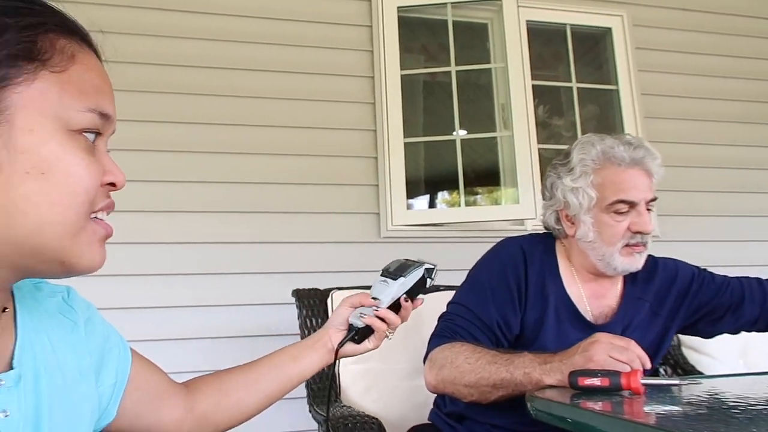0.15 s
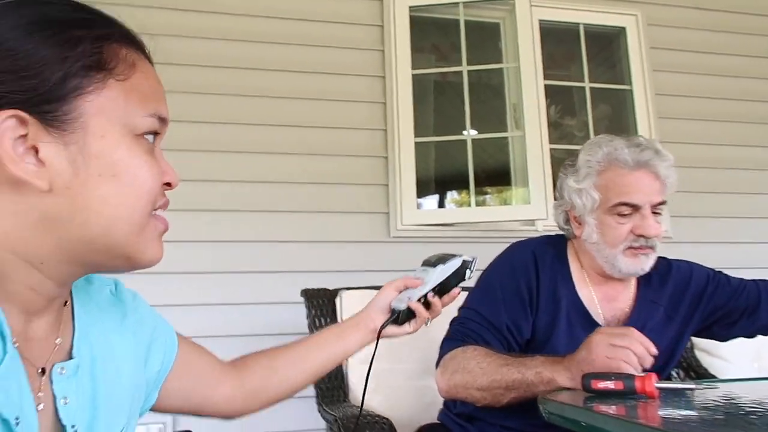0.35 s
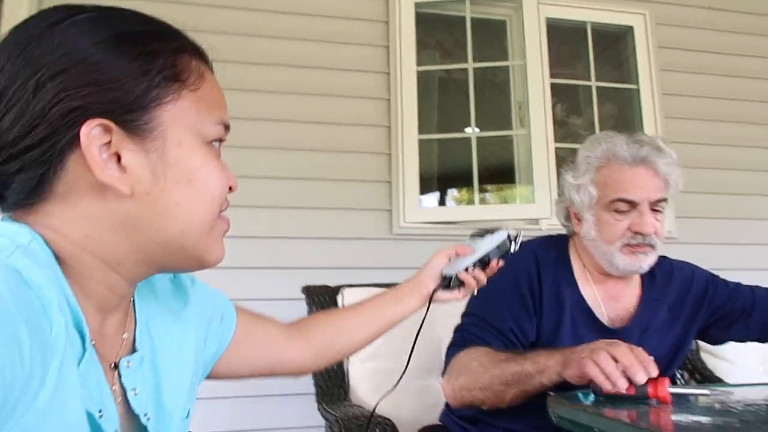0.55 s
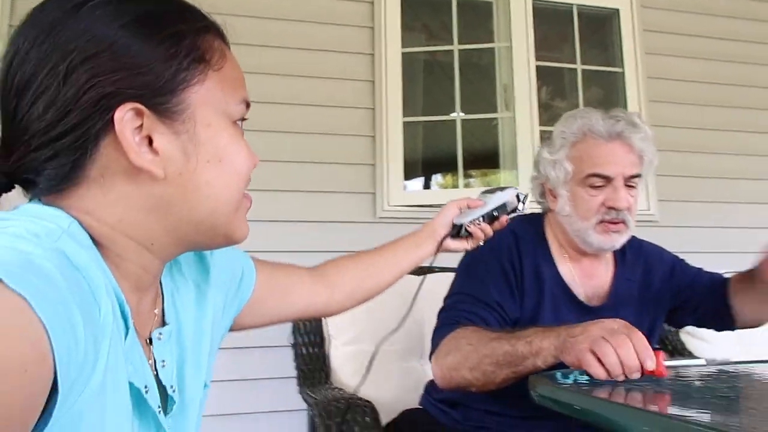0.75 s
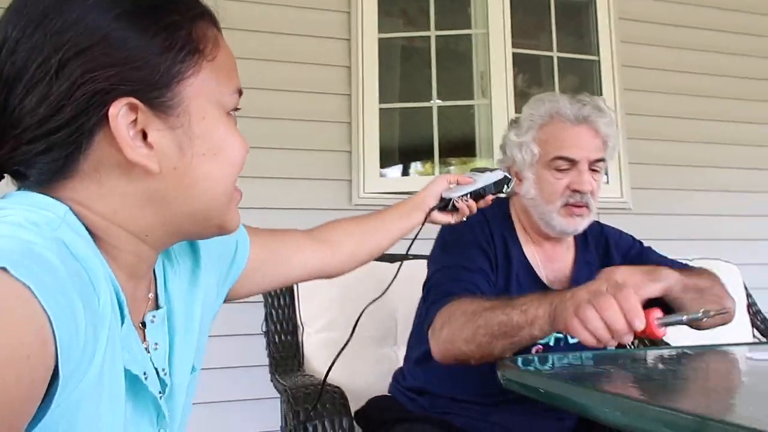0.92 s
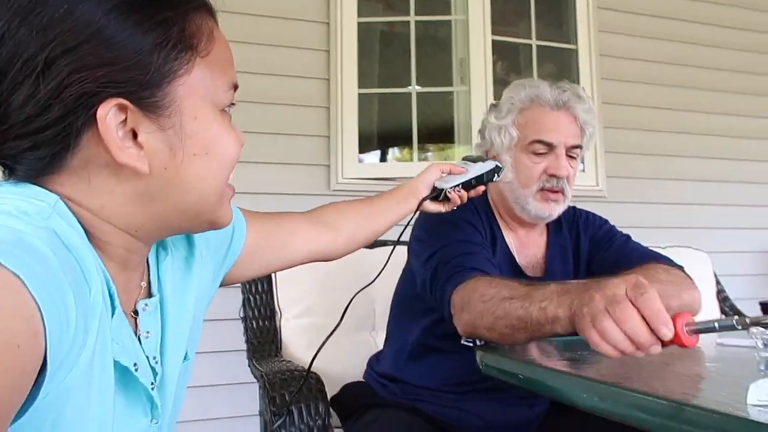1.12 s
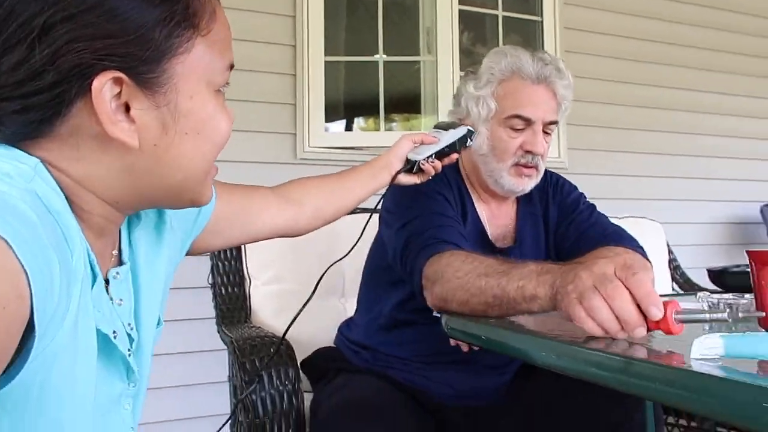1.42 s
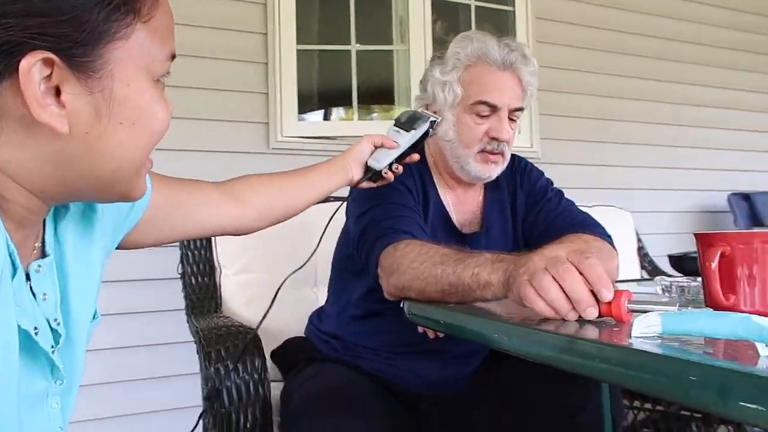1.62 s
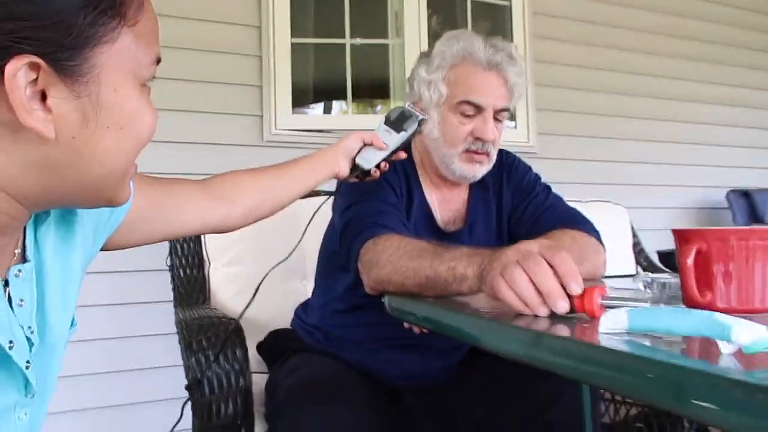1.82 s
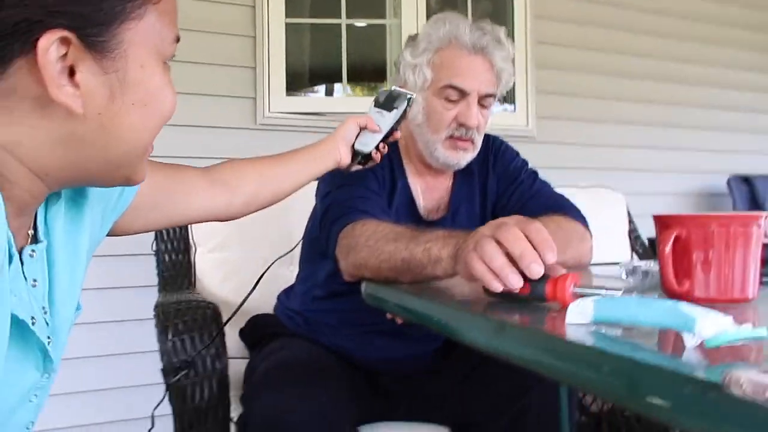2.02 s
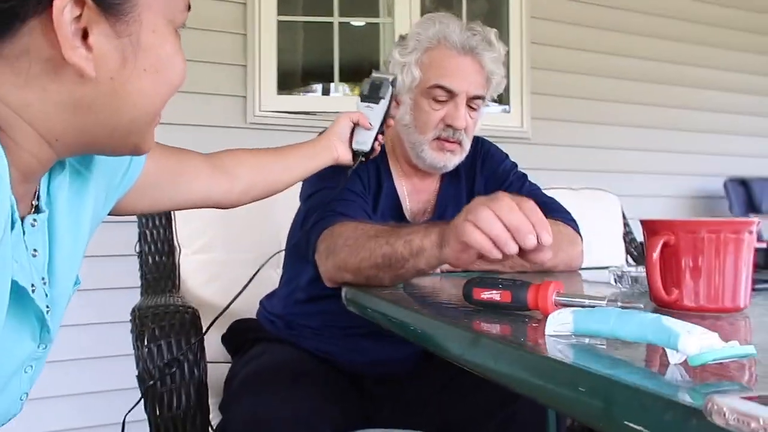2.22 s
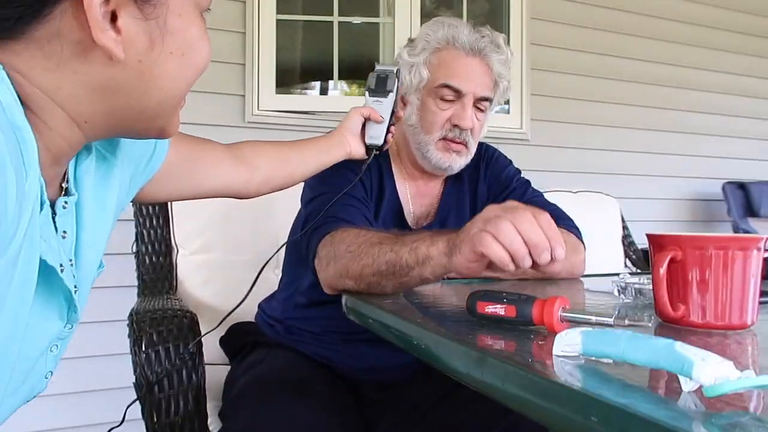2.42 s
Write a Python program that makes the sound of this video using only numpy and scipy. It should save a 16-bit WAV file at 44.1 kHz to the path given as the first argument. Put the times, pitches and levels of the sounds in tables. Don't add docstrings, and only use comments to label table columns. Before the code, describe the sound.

Steady mains hum-buzz of corded hair clippers, with a loud early clatter and later glass-table knocks

```python
import sys
import numpy as np
from scipy import signal
from scipy.fft import rfft, irfft
from scipy.io import wavfile
from scipy.ndimage import uniform_filter1d

SR = 44100
rng = np.random.default_rng(int(sys.argv[2]) if len(sys.argv) > 2 else 0)


def to_linear_factor(level_db):
    exponent = np.asarray(level_db, float) / 20
    return 10 ** exponent


def log_audio(samples):
    frames = np.atleast_2d(samples).T
    limited = np.clip(frames, -1, 1)
    pcm = np.round(limited * 32767).astype(np.int16)
    wavfile.write(sys.argv[1], SR, pcm)


N = 112454

STROKE_HZ = 120.0

# multiple of the stroke rate, level/dB
BLADE_AWAY = [(1, -8.5), (2, -16), (3, -21.5), (4, -26), (5, -3), (6, -5.5), (7, 3.5), (8, -22), (9, -10.5),
              (10, -15), (11, -11.5), (12, -27.5), (13, -7), (14, -2), (15, -8.5), (16, -12), (17, -4),
              (18, -18), (19, -6), (20, -19), (21, -11), (22, -21), (23, -15), (24, -21), (25, -7),
              (26, -9.5), (27, -6.5), (28, -20)]
BLADE_DOWN = [(1, -10), (2, -16.5), (3, -18), (4, -31), (5, -7.5), (6, -25), (7, -3), (8, -21), (9, -10),
              (10, -24), (11, -15), (12, -30), (13, -7.5), (14, -13), (15, -9), (16, -11.5), (17, -12),
              (18, -28), (19, -7.5), (20, -22), (21, -17), (22, -21), (23, -15), (24, -25), (25, -12),
              (26, -6.5), (27, -5.5), (28, -21)]
BLADE_SIDE = [(1, -13.5), (2, -26), (3, -22), (4, -35), (5, -4.5), (6, -22), (7, 4), (8, -38), (9, -6),
              (10, -32), (11, -12), (12, -28), (13, -5), (14, -21), (15, -8), (16, -16), (17, -9),
              (18, -20), (19, -10.5), (20, -15), (21, -17), (22, -22), (23, -14), (24, -15), (25, -12),
              (26, -15), (27, -10), (28, -19)]
BLADE_RAISED = [(1, -10), (2, -16), (3, -17), (4, -19.5), (5, -3.5), (6, -15), (7, 1.5), (8, -32),
                (9, -5.5), (10, -21), (11, -11), (12, -21), (13, -4.5), (14, -19), (15, -8.5), (16, -23),
                (17, -11), (18, -21), (19, -15.5), (20, -13.5), (21, -22), (22, -22), (23, -16), (24, -14),
                (25, -13.5), (26, -16.5), (27, -3.5), (28, -18)]
BLADE_TILTED = [(1, -12), (2, -19.5), (3, -21), (4, -36), (5, -9), (6, -17), (7, 2), (8, -30), (9, -6),
                (10, -28), (11, -21), (12, -22), (13, -5), (14, -13), (15, -14), (16, -14.5), (17, -9.5),
                (18, -31), (19, -3), (20, -24), (21, -13.5), (22, -29), (23, -14.5), (24, -18), (25, -10.5),
                (26, -13), (27, -13.5), (28, -22)]
BLADE_FACING = [(1, -11), (2, -23), (3, -26.5), (4, -27), (5, -3), (6, -30), (7, 2), (8, -25), (9, -16.5),
                (10, -43), (11, -21), (12, -26), (13, -5), (14, -11), (15, -23), (16, -11), (17, -1),
                (18, -30), (19, -1), (20, -21), (21, -9), (22, -7), (23, -24), (24, -2.5), (25, -13.5),
                (26, -6.5), (27, -11), (28, -14.5)]
# t/s, pose (0 away, 1 down, 2 side, 3 raised, 4 tilted, 5 facing), level/dB
HAND_TURNS = [(0, -0.5, -33.5), (.2, 0.5, -34.5), (.55, 0.97, -35), (.85, 1.2, -34), (1.0, 1.67, -33),
              (1.2, 2.5, -33), (1.45, 3, -35), (1.6, 3, -37), (1.75, 4, -33.5), (1.97, 4, -34.5),
              (2.2, 4.5, -36), (2.55, 6, -36)]
# f/Hz, width/Hz, then level/dB in each of the six poses
TEETH_RESONANCES = [
    (4200, 240, 1, 1.2, 7.4, 9.9, 3.7, 4.7),
    (5605, 140, 3.1, 2.1, 12, 12, 13, 6.2),
    (7840, 300, 2, 2, 13, 11, 6.8, 4),
]

# f/Hz, level/dB
YARD_SPECTRUM = [(30, -7.5), (60, -3), (110, -1.5), (200, -8.5), (500, -16), (2500, -17.5), (6000, -26.5),
                 (14000, -45.5)]
# f/Hz, side minus mid level/dB
YARD_SIDE = [(60, -44), (200, -13), (400, -3.5), (2000, -24), (6000, 2), (15000, 5)]
# f/Hz, level/dB
HISS_SPECTRUM = [(1000, -26), (5000, -15), (8000, 10), (14000, 0)]

# t/s, level/dB, ring f/Hz, ring t60/s, tail level/dB
CLACKS = [(.197, -28, 2600, 0.019, 6), (.2238, -3.5, 2573, 0.023, -22.5), (.2255, 7, 2567, 0.023, -22.5),
          (.2300, 5.5, 2545, 0.014, -18), (.238, -11.5, 1960, 0.0095, -17), (.2515, -12, 2600, 0.02, -24),
          (.263, -3, 2310, 0.016, -21), (.286, 2, 2735, 0.021, -13.5), (.296, -7.5, 2300, 0.015, -10.5),
          (.359, -4, 2700, 0.037, -9.5), (.369, -9, 2300, 0.023, -10), (.3865, -2, 2547, 0.035, -15.5),
          (.395, -11.5, 2040, 0.012, -13.5), (.402, -19, 2090, 0.013, -21), (.708, -31, 2750, 0.03, -12)]
# f/Hz, level/dB
CLACK_TAIL = [(88, -42), (150, -14.5), (393, -3), (545, -8), (1030, -3), (1250, -7.5), (2100, 0.5),
              (3300, -7.5), (8410, -33.5), (15000, -76)]
# t/s, level/dB, f/Hz, t60/s
THUDS = [(0.202, -17.5, 178, 0.13), (.204, -22.5, 325, 0.083), (0.289, -20, 157, 0.44),
         (0.391, -23, 149.6, 0.39), (0.743, -34, 139, 0.3), (1.651, -24, 198, 0.081),
         (1.982, -7.5, 205, 0.029), (1.989, -15, 106, 0.1), (2.003, -8.5, 148, 0.074),
         (2.03, -19.5, 104, 0.38), (2.047, -11.5, 151, 0.046), (2.021, -28.5, 62.7, 0.65)]
# t/s, level/dB, f/Hz, rise/s, t60/s
CRACKS = [
    (0.224, -12, 9300, 0.0016, 0.023),
    (0.227, -7.5, 4200, 0.0023, 0.24),
    (0.386, -21.5, 6900, 0.0061, 0.12),
]
# t/s, level/dB, ring f/Hz, ring t60/s, tail level/dB
KNOCKS = [(.72, -33, 625, 0.083, -6.5), (1.6525, -12.5, 1030, 0.016, -7), (1.654, -13, 3030, 0.018, -14),
          (1.6585, -12, 2320, 0.019, -21), (1.6555, -14.5, 654, .035, -25), (1.6655, -37, 2600, .012, -27),
          (1.670, -16, 600, .02, -31), (1.992, -31, 2220, 0.021, 4), (2.003, -24.5, 2950, 0.032, -8),
          (2.022, -25.5, 2500, 0.034, -11), (2.054, -19, 1810, 0.018, -24), (2.067, -23, 1770, 0.012, -15),
          (2.0745, 2.5, 1960, 0.0078, -38), (2.075, -14, 740, 0.022, -17),
          (2.083, -2.5, 1700, 0.0057, -26.5), (2.0875, -5.5, 1660, 0.011, -28),
          (2.091, -17, 661, 0.099, -23), (2.0995, -19, 1740, .01, -26), (2.108, -21, 555, 0.054, -27)]
# f/Hz, level/dB
KNOCK_TAIL = [(88, -33), (150, 1), (505, -1), (1050, -7), (2600, -8), (3500, -13), (4300, -21),
              (11700, -54.5), (15000, -73)]

# f/Hz, side minus mid level/dB
SIDE_FRONT = [(60, -65), (300, -39), (1500, -30), (3000, -28.5), (4500, -12), (8000, -8), (15000, -7)]
# f/Hz, side minus mid level/dB
SIDE_RIGHT = [(60, -29), (300, -38), (1200, -22), (2400, -11.5), (4400, -8.5), (9000, 5), (15000, 3)]
# t/s, gain level/dB
CAMERA_GAIN = [
    (0, -3),
    (0.234, 1),
    (0.235, -7),
    (0.27, -9.5),
    (0.448, -10),
    (.65, -7.5),
    (.9, -5),
    (1.2, -4.5),
    (1.5, 1),
    (2.55, 0),
]


def colour(x, table):
    hz, db = np.array(table, float).T
    f = np.arange(2049) * SR / 4096
    log_gain = np.interp(np.log(f + 1), np.log(hz), db) * np.log(10) / 20
    cepstrum = irfft(log_gain)
    cepstrum[1:2048] *= 2
    cepstrum[2049:] = 0
    response = irfft(np.exp(rfft(cepstrum)))
    return signal.fftconvolve(x, response)[:N]


def unit(x):
    return x / np.sqrt(np.mean(x ** 2))


def noise():
    return rng.standard_normal(N)


def band(x, order, low_hz, high_hz):
    return signal.lfilter(*signal.butter(order, [low_hz, high_hz], "band", fs=SR), x)


def walk(rate):
    hold = int(SR / rate)
    steps = np.repeat(rng.standard_normal(N // hold + 1), hold)
    return 1.15 * uniform_filter1d(uniform_filter1d(steps, hold), hold)[:N]


def fall(at, t60, rise=0.0003):
    t = np.maximum(np.arange(N) / SR - at, 0)
    return (1 - np.exp(-t / rise)) ** 2 * to_linear_factor(np.maximum(-60 * t / t60, -200))


def clippers():
    t = np.arange(N) / SR
    at, pose, level_db = np.array(HAND_TURNS).T
    pose = np.interp(t, at, pose)
    phase = 2 * np.pi * STROKE_HZ * t

    def posed(db):
        return np.interp(pose, np.arange(len(db)), db)

    views = [BLADE_AWAY, BLADE_DOWN, BLADE_SIDE, BLADE_RAISED, BLADE_TILTED, BLADE_FACING]
    low = 0
    for k, db in enumerate(np.array(views)[:, :, 1].T, start=1):
        level = posed(db) + 1.65 * walk(4.63)
        drift = 1.364 * rng.standard_normal() + 0.74 * walk(1.97)
        low = low + to_linear_factor(level) * np.cos(k * phase + drift)

    teeth = [(hz, width, posed(db)) for hz, width, *db in TEETH_RESONANCES]
    high = 0
    for k in range(29, 100):
        level = -0.56 * (k - 30.0) - 3 * (2 - k % 2)
        level = level + 4.5 * walk(2.72)
        for hz, width, db in teeth:
            level = level + db / (1 + ((k * STROKE_HZ - hz) / width) ** 2)
        high = high + to_linear_factor(level) * np.cos(k * phase + 2 * np.pi * rng.random())

    rasp_hz = 2600
    scrape = np.exp(-(phase / np.pi % 1) / 0.5)
    rasp = scrape * band(noise(), 1, rasp_hz / 3, rasp_hz)
    return to_linear_factor(np.interp(t, at, level_db)) * (unit(low) + to_linear_factor(-24) * high + to_linear_factor(-23) * unit(rasp))


def yard():
    mid = unit(colour(noise(), YARD_SPECTRUM)) * to_linear_factor(4.2 * walk(6.3))
    side = colour(unit(colour(noise(), YARD_SPECTRUM)), YARD_SIDE)
    return to_linear_factor(-45) * np.array([mid + side, mid - side])


def camera_hiss():
    return to_linear_factor(-71.5) * unit(colour(noise(), HISS_SPECTRUM))


def hits(rows, tail, t60, rise):
    t = np.arange(N) / SR
    wash = unit(colour(noise() * to_linear_factor(1.5 * walk(500)), tail))
    dull = signal.lfilter(*signal.butter(2, 3300, fs=SR), wash)
    bright = wash - dull
    out = 0
    for at, db, hz, ring_s, tail_db in rows:
        w = 2 * np.pi * hz * (t - at)
        modes = np.sin(w) + 0.32 * np.sin(.79 * w) + 0.25 * np.sin(1.3 * w)
        ring = modes * fall(at, ring_s, rise)
        rattle = dull * fall(at, t60, 0.0023) + bright * fall(at, 0.15, 0.004)
        out = out + to_linear_factor(db) * (ring + to_linear_factor(tail_db) * rattle)
    return out


def clacks():
    return hits(CLACKS, CLACK_TAIL, t60=.28, rise=0.00038)


def thuds():
    t = np.arange(N) / SR
    out = 0
    for at, db, hz, t60 in THUDS:
        waver = 0.96 * walk(60) * np.clip((t - at) * hz / 2, 0, 1)
        ring = np.sin(2 * np.pi * hz * (t - at) + waver)
        out = out + to_linear_factor(db) * ring * fall(at, t60, 0.0016)
    return out


def cracks():
    out = 0
    for at, db, hz, rise, t60 in CRACKS:
        splinter = band(noise(), 2, hz / 1.64, hz * 1.32)
        out = out + to_linear_factor(db) * fall(at, t60, rise) * splinter
    return out


def knocks():
    return hits(KNOCKS, KNOCK_TAIL, t60=0.24, rise=0.00022)


def ports(x, side, lag_s):
    k = np.arange(2048)
    echo = rng.standard_normal(len(k)) * to_linear_factor(-60 * k / SR / 0.035)
    echo = echo / np.linalg.norm(echo)
    echoed = signal.fftconvolve(x, echo)[:N]
    lagged = np.roll(x, int(lag_s * SR))
    difference = colour(lagged + to_linear_factor(0.7) * echoed, side)
    return np.array([x - difference, x + difference])


def scene():
    ahead = clippers() + thuds() + knocks()
    right = clacks() + cracks()
    pan = to_linear_factor([[-0.22], [0.22]])
    return ports(ahead, SIDE_FRONT, .0001) + ports(right, SIDE_RIGHT, .00003) * pan + yard()


def band_limit(x):
    return signal.sosfilt(signal.butter(12, 15700, fs=SR, output="sos"), x)


def record(dry):
    gain = to_linear_factor(np.interp(np.arange(N) / SR, *np.array(CAMERA_GAIN).T))
    hiss = np.array([camera_hiss() for _ in dry])
    limited = np.tanh(0.98 * dry * gain + hiss) * 1.03
    top_cut = signal.ellip(8, .2, 70, 15500, fs=SR, output="sos")
    return band_limit(signal.sosfilt(top_cut, limited))


dry = scene()
out = record(dry)
log_audio(out)
```